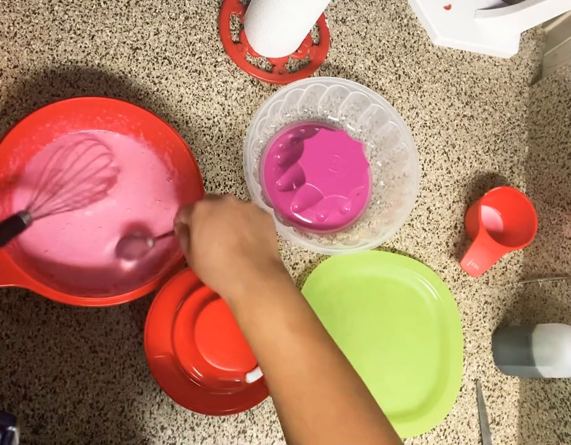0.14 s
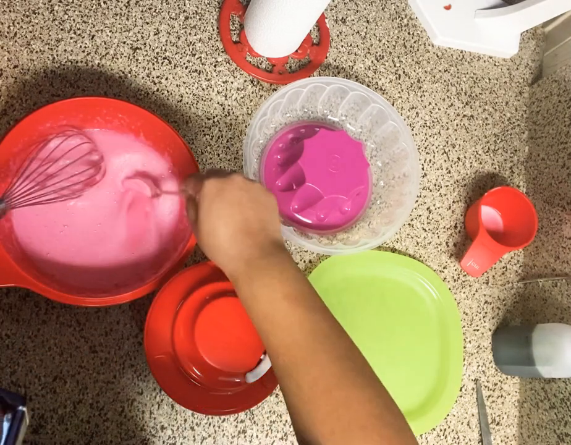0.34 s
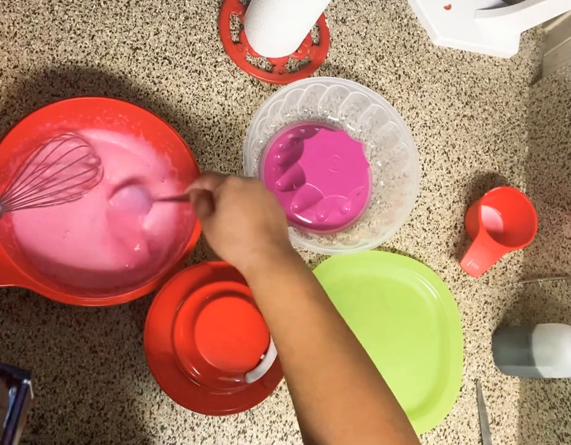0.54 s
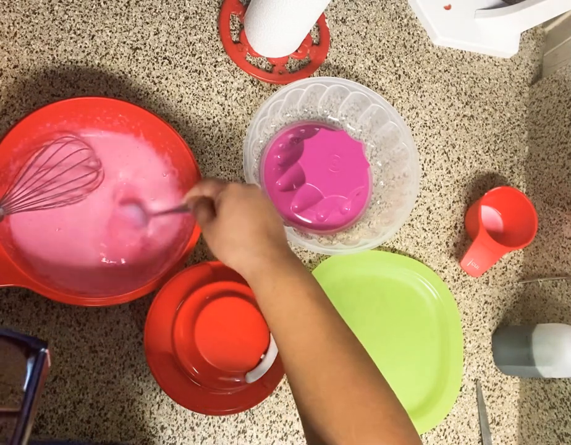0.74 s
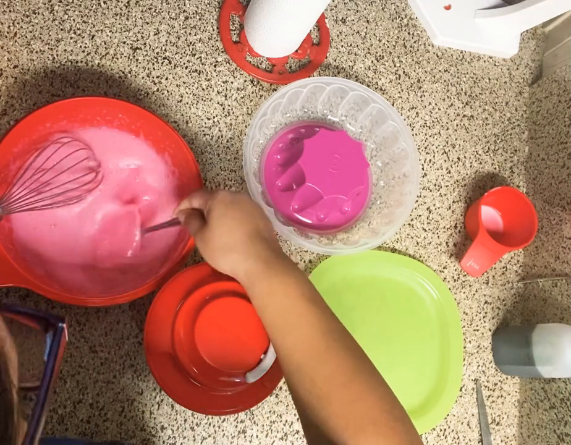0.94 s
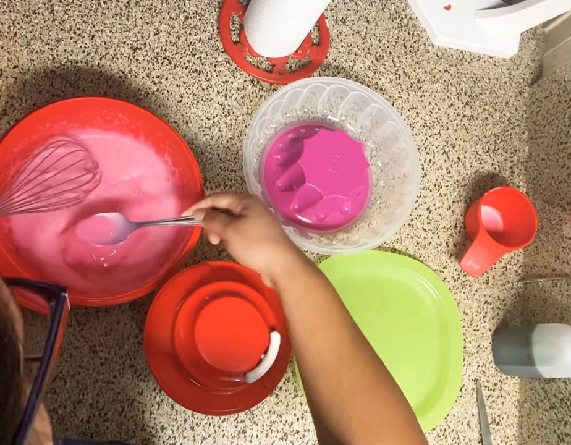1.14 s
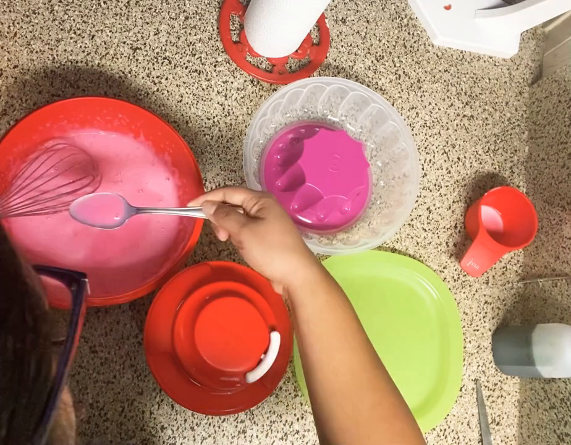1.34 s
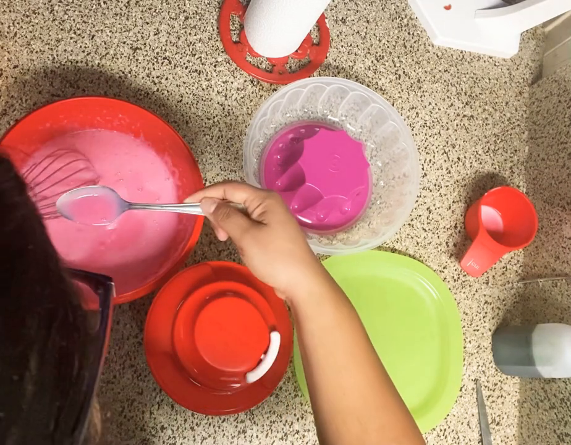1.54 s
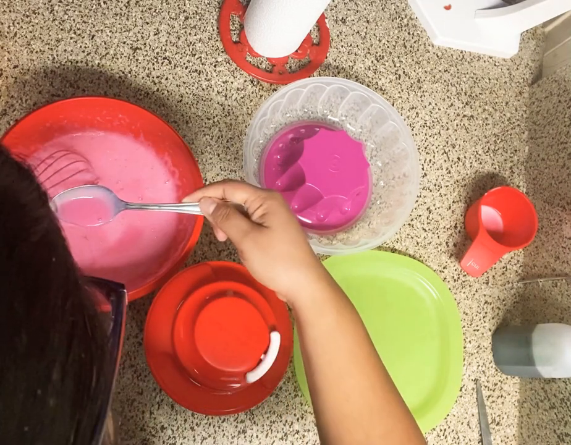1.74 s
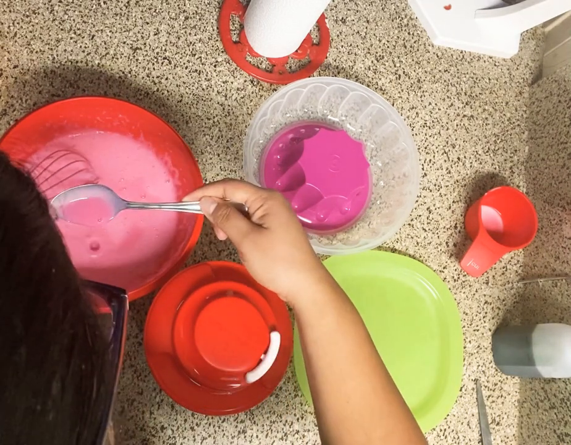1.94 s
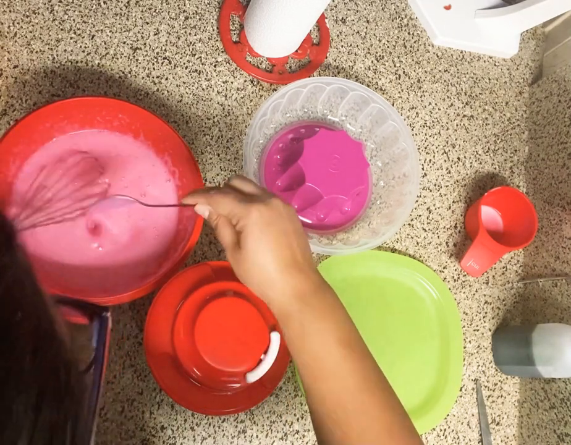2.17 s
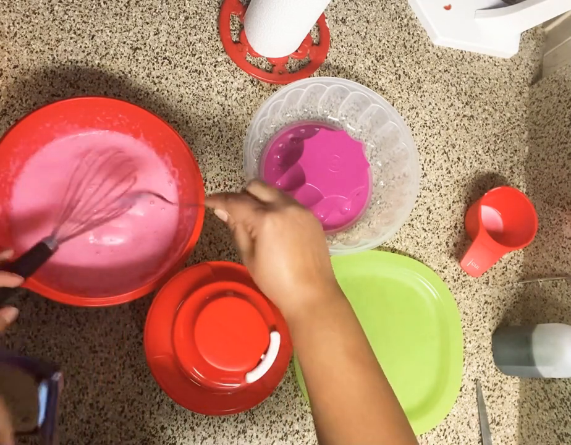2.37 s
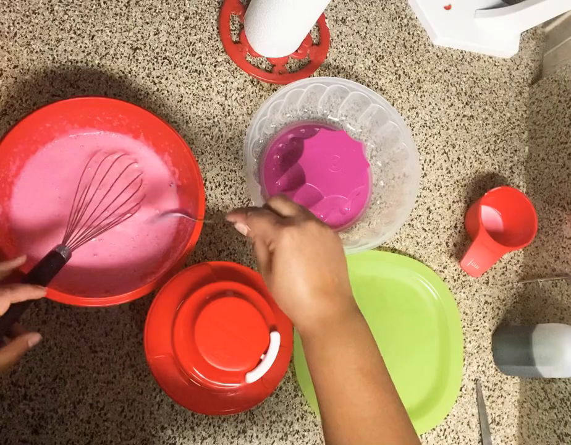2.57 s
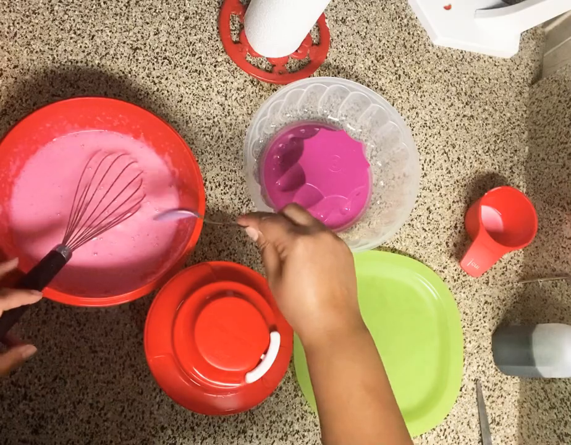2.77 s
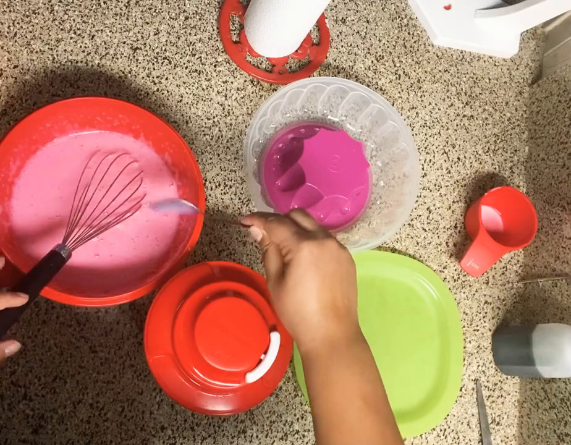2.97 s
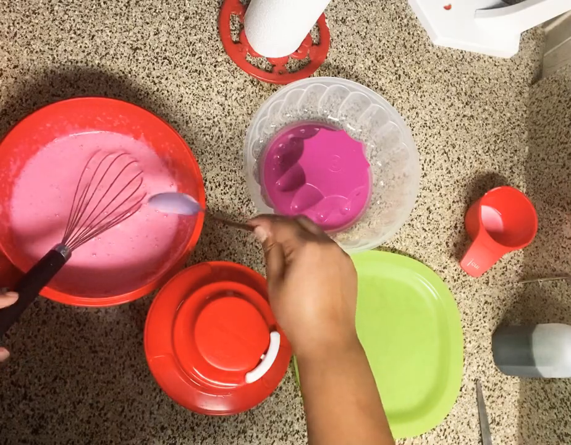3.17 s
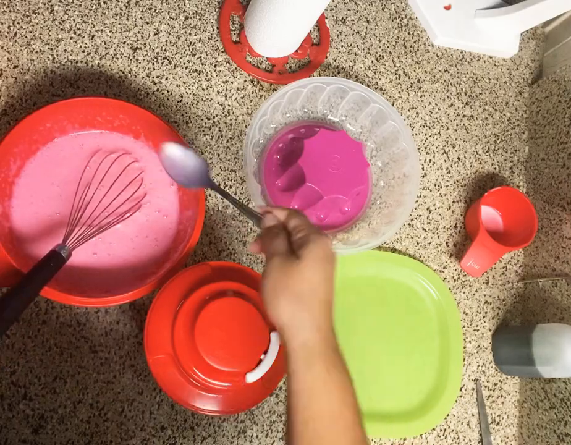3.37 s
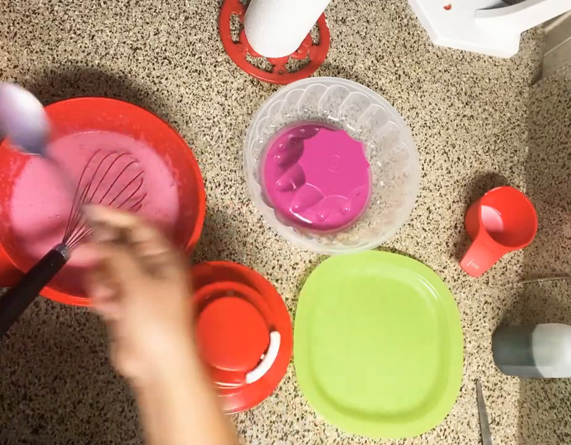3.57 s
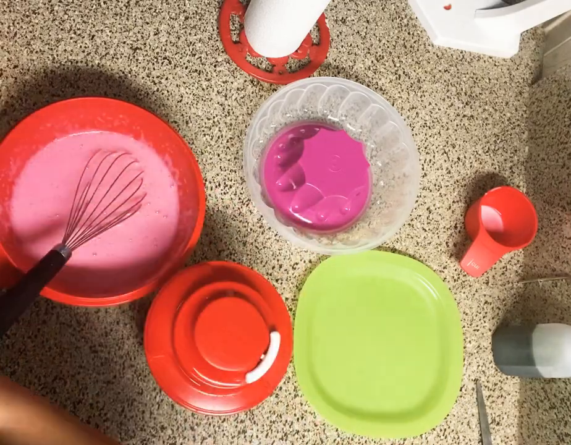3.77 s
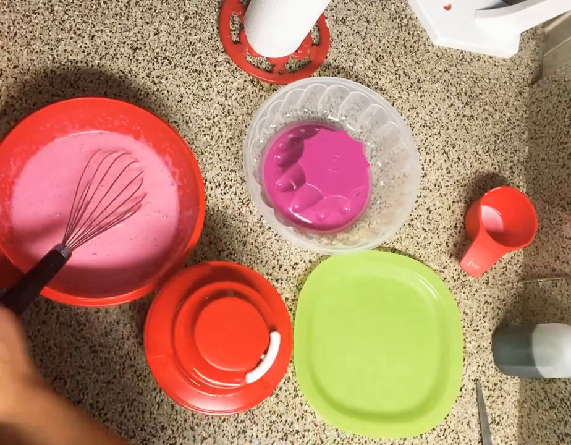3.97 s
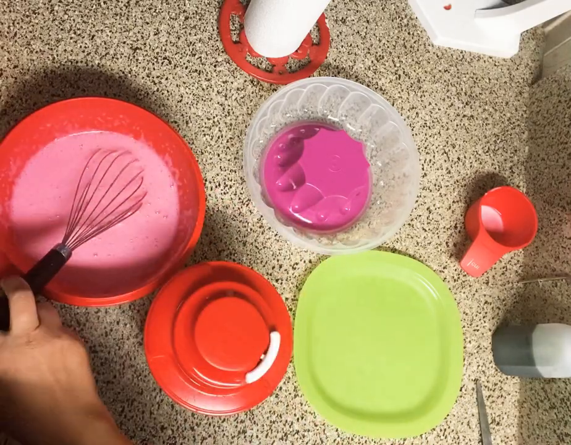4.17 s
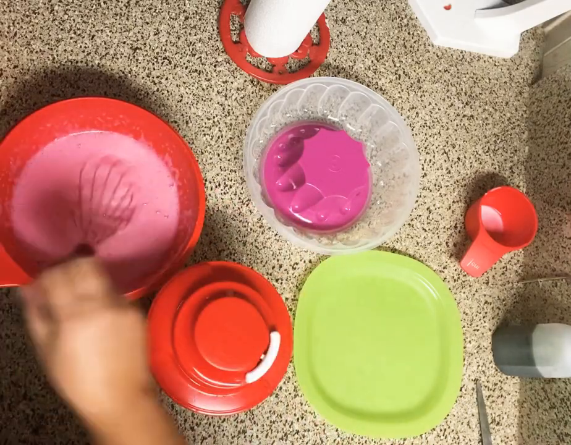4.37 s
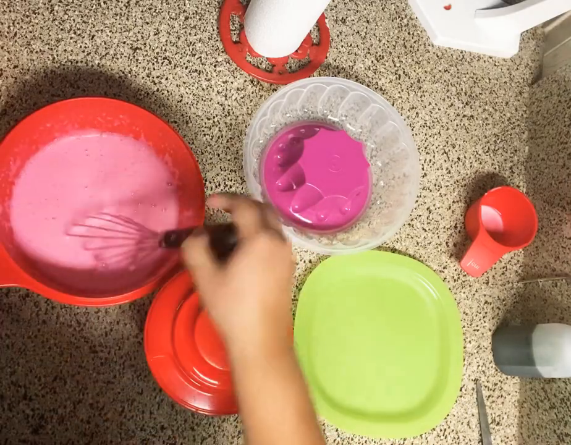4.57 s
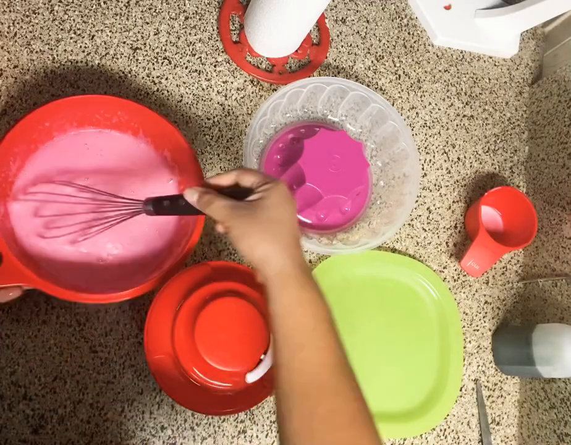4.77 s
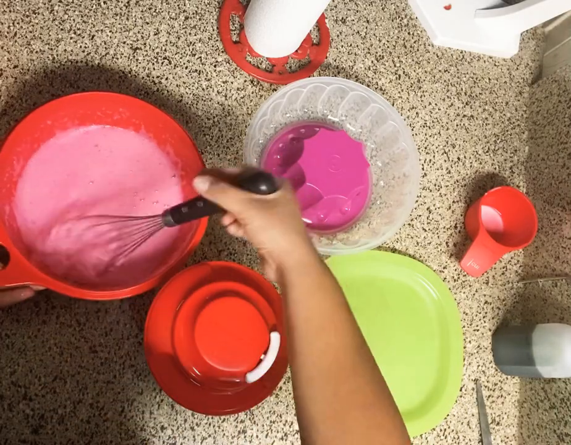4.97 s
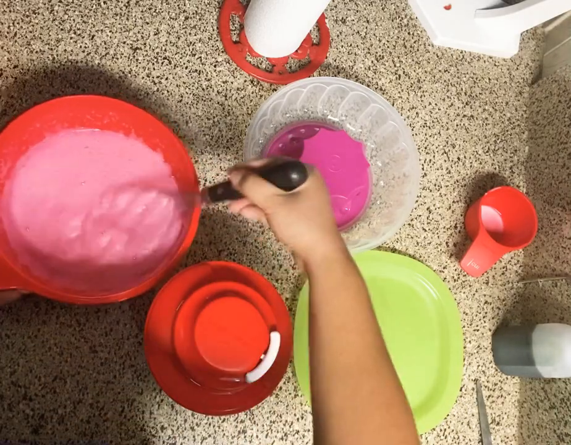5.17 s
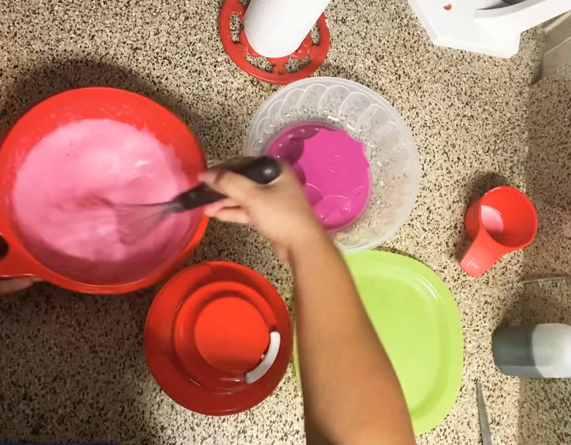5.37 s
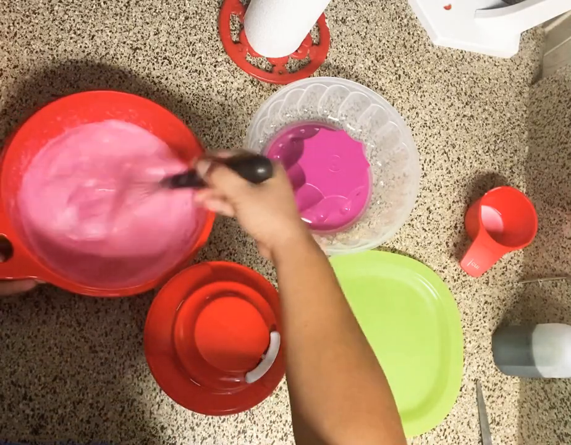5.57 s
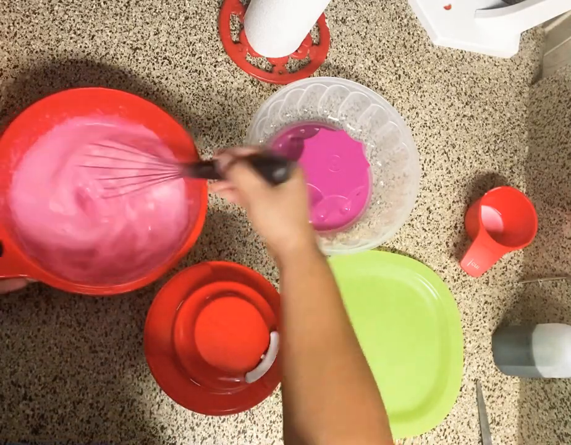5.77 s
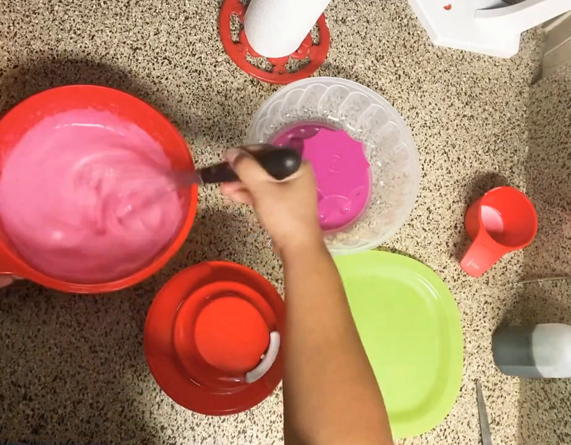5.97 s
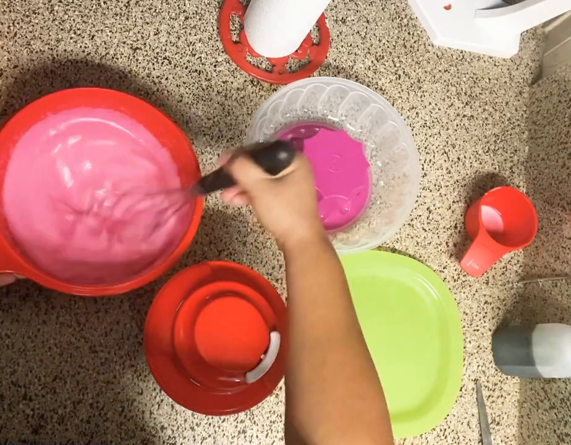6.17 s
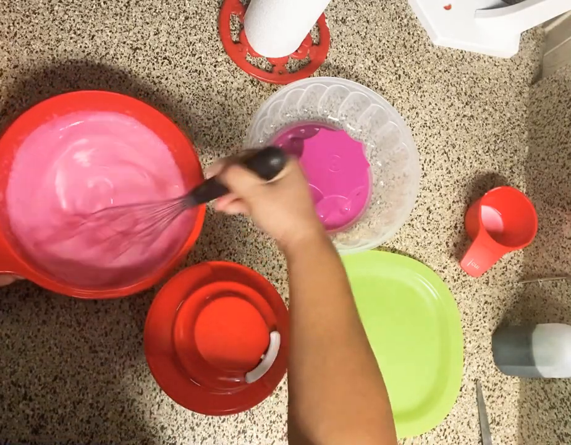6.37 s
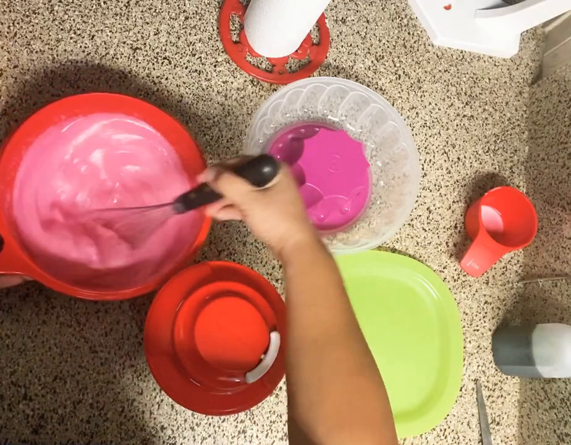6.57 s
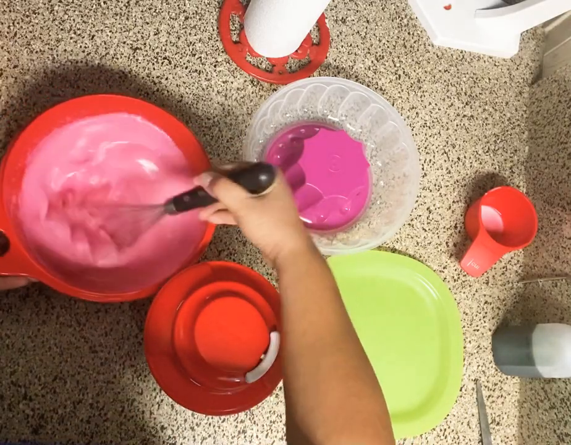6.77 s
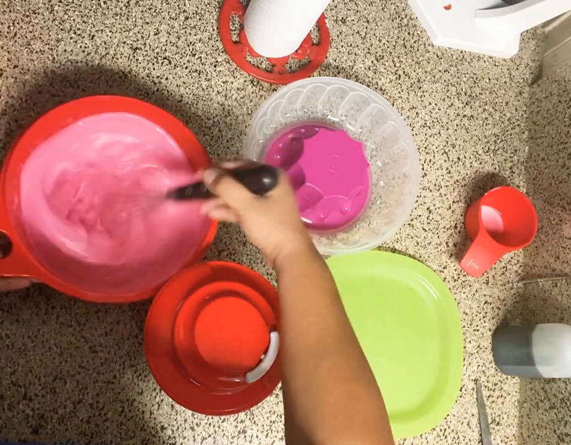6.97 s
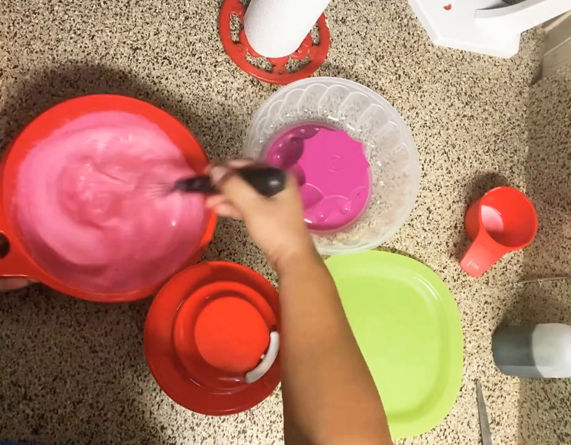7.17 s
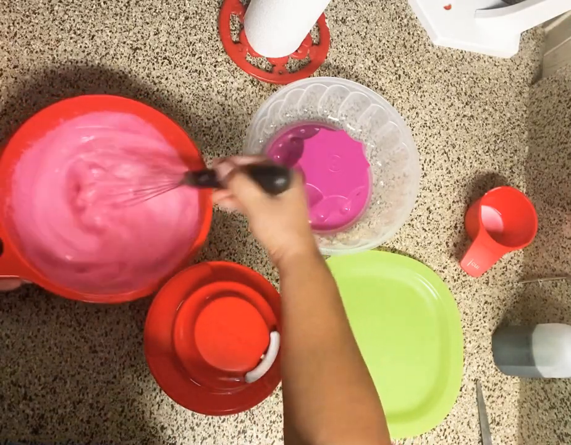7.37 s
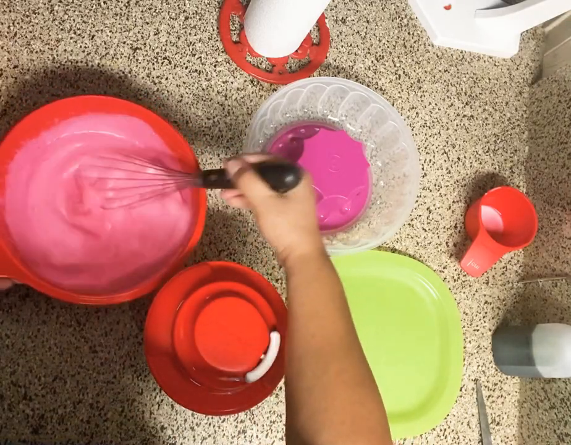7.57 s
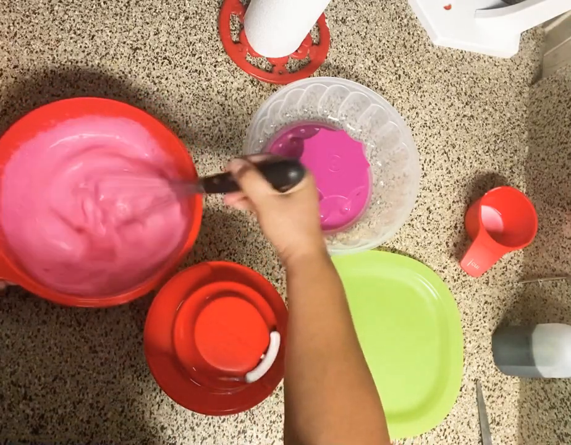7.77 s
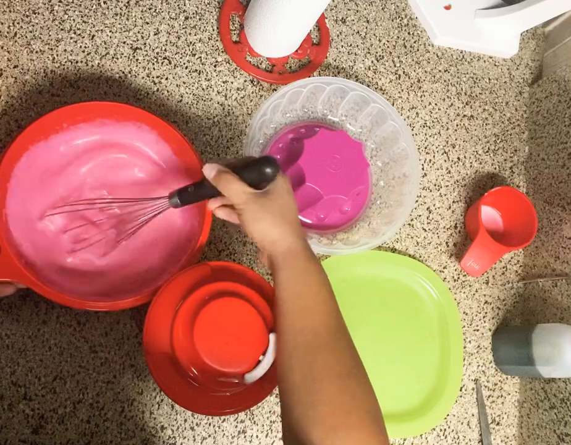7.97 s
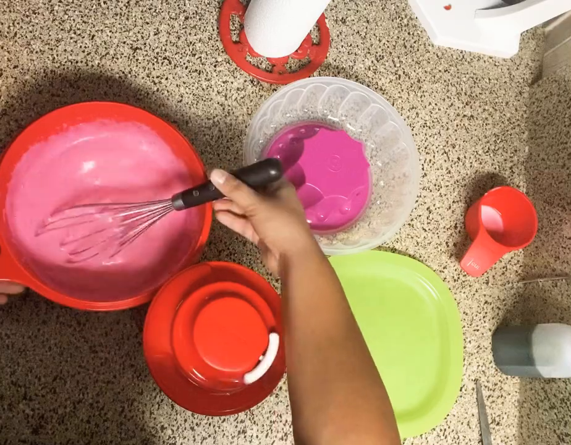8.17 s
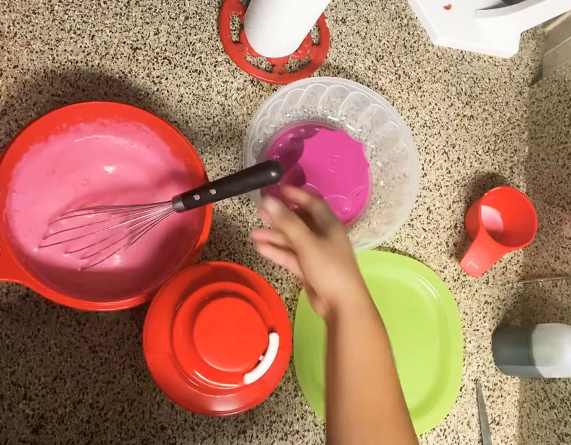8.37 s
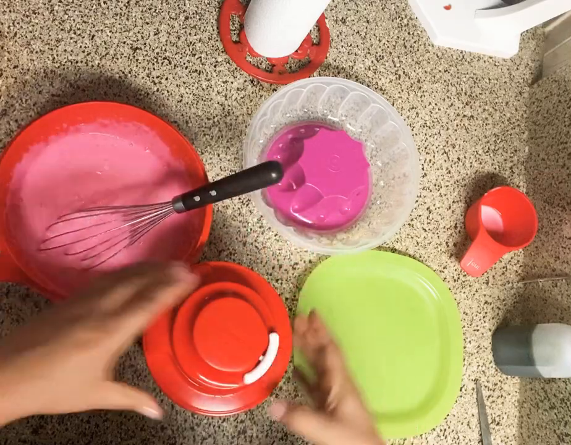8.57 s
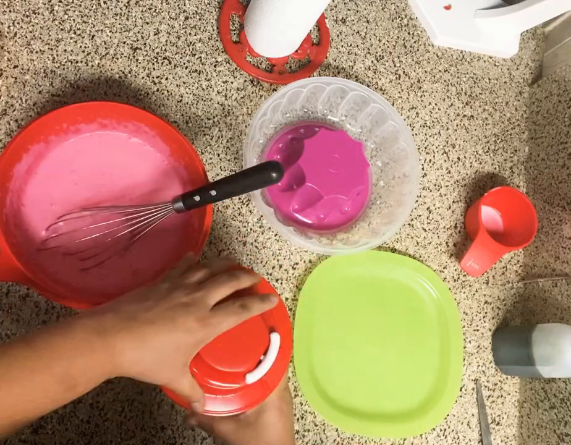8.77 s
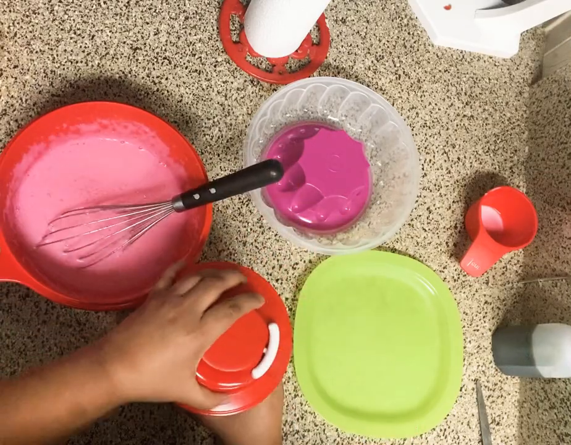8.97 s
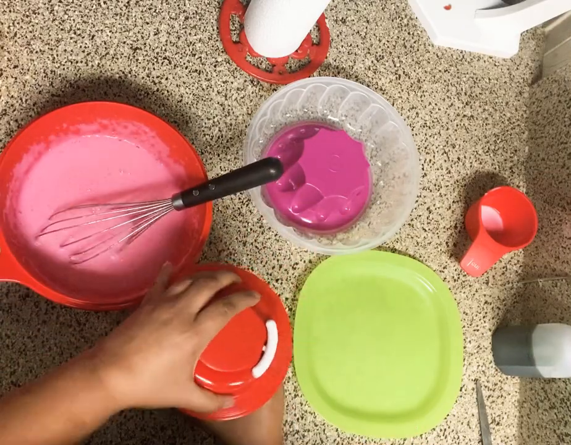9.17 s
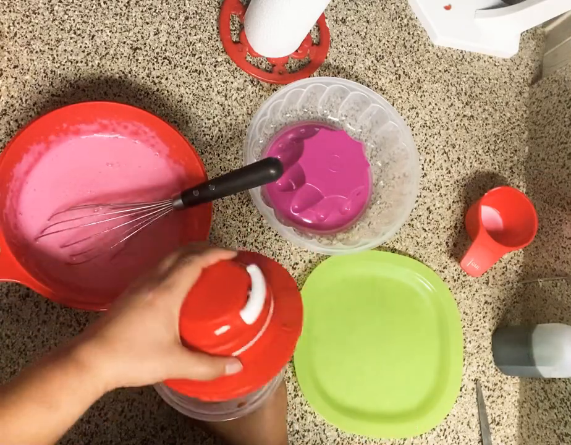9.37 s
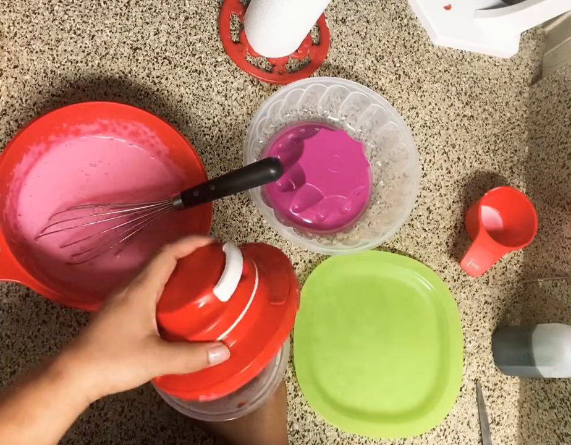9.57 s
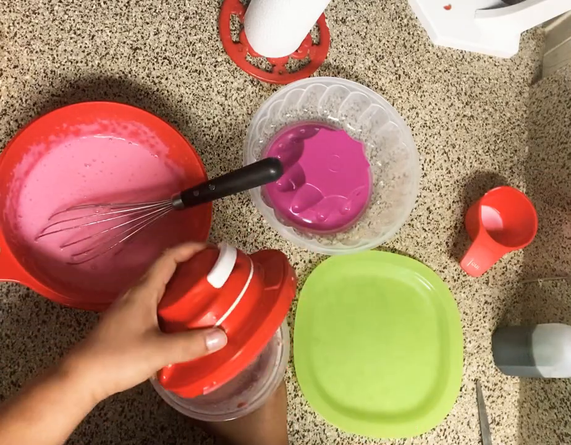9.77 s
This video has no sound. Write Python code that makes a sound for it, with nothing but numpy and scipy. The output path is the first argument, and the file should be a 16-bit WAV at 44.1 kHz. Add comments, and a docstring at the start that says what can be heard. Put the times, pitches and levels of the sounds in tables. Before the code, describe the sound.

Close up in a small kitchen, a metal spoon drags quietly through thin batter in a plastic bowl with small wet plops, judders up the wall and raps the rim three times. A whisk clinks brightly, then beats fast and evenly with sloshing, spray and dull wall knocks. It stops; a plastic tub bumps and slides on stone and its lid creaks faintly. Low room rumble and hiss.

```python
"""Metal drags softly on the floor of a plastic bowl of thin batter: slip noise, with wet clicks and plops.
A spoon judders up the wall in growing slips and is rapped on the rim: a tick, wall modes, base modes.
A wire whisk clinks (detuned metal modes), then beats two strokes to a turn: filtered grit and bubbles.
It is laid down, a plastic tub bumps and slides on a stone counter, and a lid creaks in the grip.
Close microphones also pick up a short kitchen echo, low rumble, hiss and an appliance's whines."""
import sys
import numpy as np
from scipy import signal
from scipy.fft import rfft, irfft
from scipy.io import wavfile
from scipy.ndimage import uniform_filter1d

SR = 44100
rng = np.random.default_rng(int(sys.argv[2]) if len(sys.argv) > 2 else 0)


def int16_out(signal):
    """Quantize to a 16-bit WAV file."""
    q = np.round(np.clip(np.atleast_2d(signal).T, -1, 1) * 32767)
    wavfile.write(sys.argv[1], SR, q.astype(np.int16))


N = 433062
TIME = np.arange(N) / SR
AGE = TIME[:SR // 2]  # seconds since the start of an event

# Modes of the bowl wall. Each row: frequency in Hz, relative level in dB, t60 in s.
WALL = [(501, -7, 0.11), (708.7, 7, 0.034), (760.6, -1.5, 0.085), (850, -8.5, 0.13), (946, -12, 0.038),
        (1190, -23.5, 0.02), (1320, -14.5, 0.13)]
# Modes of the full bowl bouncing on its base. Each row: frequency in Hz, relative level in dB, t60 in s.
BASE = [(57.3, -7, 0.6), (88, -1, 0.42), (121, 2, 0.28), (156, 5, 0.08), (214.5, 0.5, 0.18),
        (275.7, -9.5, 0.072), (405.5, -5, 0.06)]
# Colour of a dull or wet contact. Each row: frequency in Hz, relative level in dB.
CLACK = [(400, -15.5), (900, -6.5), (1400, -8), (2400, -9.5), (3200, -21.5), (15000, -48)]
# Colour of a bright, hard contact. Each row: frequency in Hz, relative level in dB.
TICK = [(800, -27.5), (2500, -0.5), (4000, 2), (6000, 7), (9000, 6.5), (12500, 0.5), (16000, -12.5)]
# Colour of a low bump. Each row: frequency in Hz, relative level in dB.
BUMP = [(40, -11.5), (80, 2), (200, 2), (450, -13.5), (1000, -22.5), (6000, -63)]
# Colour of metal scraping. Each row: frequency in Hz, relative level in dB.
SCRAPING = [(200, 0), (400, 5), (1000, -5.5), (2800, 1), (4500, -6.5), (8000, -9.5), (15000, -26.5)]
# Colour of plastic sliding. Each row: frequency in Hz, relative level in dB.
SLIDING = [(300, 0), (1200, -2), (2900, -1), (4500, -11), (14000, -35)]
# Stereo width of echo and room noise. Each row: frequency in Hz, side signal as a relative share.
APART = [(60, .02), (200, 0.12), (600, 0.55), (1400, 1), (3000, 1), (7000, 0.63)]


def amp(db):
    """Decibels to gain."""
    return 10 ** (np.asarray(db) / 20)


def evened(x):
    """Scales to rms 1."""
    return x / np.sqrt(np.mean(x ** 2) + 1e-20)


def crested(x):
    """Scales so that the loudest two milliseconds have rms 1."""
    return x / np.sqrt(uniform_filter1d(x ** 2, size=88).max() + 1e-20)


def read(points, hz):
    """Reads a table on a log-frequency axis."""
    f, value = np.transpose(points)
    return np.interp(np.log(hz + 1), np.log(f + 1), value)


def add(mix, s, sound):
    """Mixes a sound in at time s."""
    part = mix[max(round(s * SR), 0):][:len(sound)]
    part += sound[:len(part)]


def tint(x, spectrum, size=8192):
    """Causal minimum-phase filter with the given spectrum."""
    log_gain = np.log(amp(read(spectrum, abs(np.fft.fftfreq(size, 1 / SR)))))
    response = np.exp(np.conj(signal.hilbert(log_gain)))
    taps = np.fft.ifft(response).real[:size // 2]
    return signal.oaconvolve(x, taps)[:len(x)]


def grit(per_s, spread_db):
    """A random train of clicks of uneven size and either sign."""
    size = amp(spread_db * np.minimum(rng.exponential(1, N), 4))
    return size * rng.choice([-1, 1], N) * (rng.random(N) < per_s / SR)


def puff(spectrum, t60):
    """A contact: a burst of coloured noise that dies quickly."""
    return crested(tint(rng.standard_normal(len(AGE)) * amp(-60 * AGE / t60), spectrum))


def ring(modes, stretch=1, scatter_db=0, bend=0, rise_s=0.0017):
    """Dying modes; a dented wall starts sharp by 0.3 times bend and relaxes."""
    hz, db, t60 = np.transpose(modes)[:, :, None]
    clock = stretch * (AGE + bend * 0.0024 * (1 - np.exp(-AGE / 0.008)))
    db = db + scatter_db * rng.standard_normal(db.shape)
    tones = amp(db - 60 * AGE / t60) * np.sin(2 * np.pi * hz * clock)
    return crested(tones.sum(0) * (1 - np.exp(-AGE / rise_s)))


def plop(hz, t60, glide, rise_s=0.00051):
    """An air pocket or thud rings briefly; for 0.1 s its pitch glides by this share of itself per second."""
    tone = np.sin(2 * np.pi * hz * AGE * (1 + glide * np.minimum(AGE, .1) / 2))
    return crested(tone * amp(-60 * AGE / t60) * (1 - np.exp(-AGE / rise_s)))


def rubs(rows, attack, sag_db, release_s):
    """A gain curve for rubs: each swells over a share of its length, eases off and lets go."""
    out = np.zeros(N)
    for start, length, db in rows:
        held = amp(db + sag_db * np.minimum(AGE / length, 1)) * np.minimum(AGE / (attack * length), 1)
        add(out, start, held * np.exp(-np.maximum(AGE - length, 0) / release_s))
    return out


def strokes(count=12):
    """The whisk circles and hurries: rows of start s, end s, slosh dB, spray dB and knock dB."""
    first_turn_s, turn_s, hurry_s = 5.2818, .2448, .0029  # each turn is hurry_s shorter than the last
    stop_s = 7.862
    slosh_follows = 0.34  # spray follows the effort fully, slosh and knocks by this share
    # How hard the hand beats. Each row: time in seconds, effort in dB.
    effort_points = [(5.25, -4.5), (5.55, -1.5), (6.5, -0.5), (6.95, 2.5), (7.4, -0.5), (7.6, -2.5),
                     (7.82, -7)]
    # Back and forward stroke of a turn. Each row: start in turns, length in turns, then the
    # slosh, spray and wall knock in dB before the effort is added.
    turn_rows = [(-.405, .39, -37, -45.5, -37), (0, .385, -34.5, -38.5, -37)]
    rows = []
    for turn in range(count):
        for phase, length, slosh_db, spray_db, knock_db in turn_rows:
            turns = turn + phase + np.array([0, length])
            start, end = first_turn_s + turn_s * turns - hurry_s * turns ** 2 / 2
            effort = np.interp(start, *np.transpose(effort_points))
            push = slosh_follows * effort
            rows.append((start, min(end, stop_s), slosh_db + push, spray_db + effort, knock_db + push))
    return rows


def bubbles(low_hz, high_hz, per_s, cycles, count=30):
    """Air pockets of many sizes, each ringing briefly with a rising pitch."""
    out, t = np.zeros(N), AGE[:2048]
    for hz in np.geomspace(low_hz, high_hz, count):
        age = t * hz / cycles
        pop = np.exp(-3 * age) * np.sin(2 * np.pi * hz * t * (1 + 0.07 * np.minimum(age, 2)))
        when, luck = rng.random((int(per_s * N / SR / count), 2)).T
        births = np.bincount((when * N).astype(int), (luck + 0.0386) ** -.5, N)  # a few are much louder
        out += np.sqrt(hz) * signal.oaconvolve(births, pop)[:N]
    return evened(out)


def swirl(x, share=0.67, nearest_s=0.00021, farthest_s=0.001095):
    """The bowl wall reflects the splash from a changing distance, so its colour glides."""
    knots = np.arange(0, TIME[-1] + .1, .055)
    delay = np.interp(TIME, knots, rng.uniform(nearest_s, farthest_s, len(knots)))
    return evened(x + share * np.interp(TIME - delay, TIME, x))


def churn():
    """A gain curve for the stirred-up batter, which keeps lapping between strokes."""
    # One row: start in seconds, length in seconds, level in dB.
    start, length, db = (5.15, 2.68, -45)
    return amp(db) * (TIME > start) * np.exp(-np.maximum(TIME - start - length, 0) / .035)


def beating(beat, rise_s=0.0068, fall_s=0.038, sway_s=0.053):
    """Each stroke slaps into the batter; spray swells with the wires' speed, then the wave sways the bowl."""
    # The whisk dips in and finds its rhythm. Each row: start in seconds, length in seconds,
    # slosh in dB, spray in dB.
    dip_rows = [(4.897, 0.015, -40, -49), (4.941, 0.032, -41, -49.5), (5.028, 0.032, -39.5, -51),
                (5.11, 0.083, -38.5, -53.5)]
    # Colour of the slosh. Each row: frequency in Hz, relative level in dB.
    slosh_colour = [(250, -34), (350, -7), (480, 4.5), (760, 11), (1090, -4), (1400, -12), (1900, -6),
                    (2520, 5.5), (3100, -39), (3900, -9.5), (7000, -37.5), (14000, -38)]
    # Colour of the spray. Each row: frequency in Hz, relative level in dB.
    spray_colour = [(1200, -39.5), (2600, 7), (3400, 3), (4200, 4), (5300, 0.5), (6600, 4.5), (7800, -6.5),
                    (10000, -8.5), (12000, -13), (13500, -50), (16000, -40)]
    # Colour of the swaying bowl. Each row: frequency in Hz, relative level in dB.
    sway_colour = [(40, -12.5), (75, -6.5), (95, -3.5), (121, 3.5), (150, -14), (180, -21.5), (217, 1.5),
                   (260, -14.5), (500, -41)]
    slosh, spray, sway, slaps = np.zeros((4, N))
    dips = [(s, s + length, slosh_db, spray_db) for s, length, slosh_db, spray_db in dip_rows]
    for start, end, slosh_db, spray_db, *_ in dips + beat:
        length = end - start
        entry = np.minimum(AGE / rise_s, 1)
        swell = np.exp(-((AGE / length - .47) / 0.41) ** 2)
        release = np.exp(-np.maximum(AGE - 0.96 * length, 0) / fall_s)
        add(slosh, start - .003, amp(slosh_db) * entry * release)
        add(spray, start, amp(spray_db + 4.5) * swell)
        add(sway, start + sway_s, amp(slosh_db) * np.sqrt(swell) * entry)
        wet = amp(slosh_db - 2) * puff(CLACK, t60=0.046)
        bright = amp(spray_db - 4) * puff(TICK, t60=0.033)
        add(slaps, start + .003, wet + bright)
    foam = swirl(tint(grit(per_s=6000, spread_db=1.5), slosh_colour))
    froth = bubbles(low_hz=930.0, high_hz=3150, per_s=600, cycles=27.7)
    drops = swirl(tint(grit(per_s=6200, spread_db=3.5), spray_colour))
    wave = evened(tint(grit(per_s=1600, spread_db=-1.0), sway_colour))
    liquid = np.hypot(slosh, churn()) * amp(-7.5) * (foam + froth)
    return slaps + liquid + amp(-2) * spray * drops + amp(-7) * sway * wave


def loops(beat, loop_db=-2, count=3):
    """Within each stroke single wire loops break the surface with a short wet click."""
    out = np.zeros(N)
    for start, end, slosh_db, *_ in beat:
        for share in (np.arange(count) + rng.random(count)) / count:
            db = slosh_db + loop_db + 2 * rng.standard_normal()
            add(out, start + share * (end - start), amp(db) * puff(CLACK, t60=.02))
    return out


def furrows(beat, open_hz=1300, shut_hz=2600, width_hz=380, furrow_db=-7):
    """The wires plough a furrow in the batter; as it closes behind them its hollow note rises."""
    out, r = np.zeros(N), np.exp(-np.pi * width_hz / SR)
    for start, end, slosh_db, *_ in beat:
        gone = np.minimum(AGE / (end - start), 1)
        # slow noise on a gliding carrier makes a narrow band that moves
        hiss = signal.lfilter([1], [1, -2 * r, r * r], rng.standard_normal((2, len(AGE))))
        angle = 2 * np.pi * np.cumsum(open_hz * (shut_hz / open_hz) ** gone) / SR
        note = evened(hiss[0] * np.cos(angle) + hiss[1] * np.sin(angle))
        add(out, start, amp(slosh_db + furrow_db) * np.sin(np.pi * gone) * note)
    return out


def wall_hits(beat, late_s=.008, low_hz=720, high_hz=900):
    """Each stroke grazes the near wall as it enters: rows of start s, level dB and pitch Hz."""
    return [(start + late_s * rng.random(), db + rng.standard_normal(), rng.uniform(low_hz, high_hz))
            for start, *_, db in beat]


def knocks(beat):
    """The wires hit the wall through the batter, with a falling gulp; some strokes tip the bowl."""
    # Whisk against wall. Each row: start in seconds, relative level in dB, pitch in Hz.
    knock_rows = [(4.507, -31, 794), (4.662, -25, 748), (4.901, -37.5, 870), (4.95, -30.5, 757),
                  (5.038, -29, 798), (5.161, -32, 772), (5.227, -28, 802), (5.337, -26, 817),
                  (5.515, -28.5, 760), (5.591, -32, 685), (5.733, -34.5, 758), (5.832, -30, 783),
                  (6.072, -29, 665), (6.297, -32.5, 745), (6.377, -28.5, 802), (6.478, -32, 838),
                  (6.666, -33, 756), (6.75, -33.5, 892), (7.009, -30.5, 860), (7.218, -32.5, 895),
                  (7.262, -30.5, 780), (7.425, -29.5, 660), (7.586, -30, 800), (7.657, -30.5, 790)]
    # The whisk catches the rim, and the bowl tips and drops back.
    # Each row: start in seconds, relative level in dB.
    rocking_rows = [(4.172, -36.5), (4.681, -29), (5.44, -29.5), (5.683, -25.5), (7.734, -30), (7.858, -27)]
    out = np.zeros(N)
    for s, db, hz in list(knock_rows) + wall_hits(beat):
        # the pitch is that of the wall's third mode
        add(out, s, amp(db - 9) * ring(WALL, stretch=hz / WALL[2][0], scatter_db=5, rise_s=0.004))
        add(out, s, amp(db - 6.5) * plop(hz, t60=0.056, glide=-14 * rng.random(), rise_s=0.008))
        add(out, s, amp(db - 9) * puff(CLACK, t60=0.075))
    for s, db in rocking_rows:
        base = ring(BASE[:4], stretch=rng.uniform(1.0, 1.03), scatter_db=3.5, rise_s=0.01)
        add(out, s, amp(db - 3) * base)
    return out


def splashes():
    """The hardest strokes smack the batter and trap a pocket of air, whose pitch rises or falls."""
    # Each row: start in seconds, relative level in dB, pitch of the air pocket in Hz.
    slap_rows = [(5.681, -33.5, 1350), (6.009, -32.5, 1660), (6.248, -28.5, 2225), (6.702, -32.5, 1650),
                 (6.93, -35, 2410), (6.975, -30.5, 1350), (7.147, -31, 2553), (7.584, -33, 1360)]
    out = np.zeros(N)
    for s, db, hz in slap_rows:
        pocket = plop(hz, t60=0.04, glide=0.96 * rng.uniform(-1.15, 1), rise_s=0.0035)
        add(out, s, amp(db - 1) * (puff(CLACK, t60=0.081) + pocket))
    return out


def raps(bounce_s=0.0071):
    """A tick on the rim, the wall's note cut short by the resting spoon, then the bowl drops on its base."""
    # Spoon or handle on the rim. Each row: start in seconds, force in dB, wall note in dB against the force.
    rap_rows = [(0.388, -33.5, -0.5), (2.16, -39.5, -9.5), (2.179, -33, -6.5), (2.726, -18.5, -1.5),
                (2.917, -37, 0), (3.052, -18, 0), (3.205, -19.5, 5), (8.06, -37.5, -0.5)]
    tick_growth = 1.427  # harder raps are brighter: dB of tick per dB of force
    # after a rap harder than the threshold, the spoon falls back on the rim once
    rebound_s, rebound_db, rebound_above_db = .035, -18, -28
    rebounds = [(s + rebound_s, force + rebound_db, 0) for s, force, _ in rap_rows if force > rebound_above_db]
    out = np.zeros(N)
    for s, force, wall in rap_rows + rebounds:
        grip = amp(4) * (.3 + .7 * np.exp(-(AGE / .009) ** 2))
        note = grip * ring(WALL, scatter_db=1, bend=.18, rise_s=.002)
        add(out, s, amp(force) * (amp(wall - 2.5) * note + amp(-9) * puff(CLACK, t60=0.093)))
        add(out, s, amp(tick_growth * force - 4) * puff(TICK, t60=0.017))
        base = ring(BASE, stretch=rng.uniform(0.92, 1.03), scatter_db=5.5, rise_s=0.0043)
        add(out, s + bounce_s, amp(force) * (amp(-3.0) * base + amp(-2.5) * puff(BUMP, t60=0.13)))
    return out


def judder(top_hz=220, end_hz=180, jitter=0.14, growth_db=11, uneven_db=3.0, rasp_db=-30):
    """The spoon, drawn up the wall, sticks and slips ever more strongly, fastest midway, with a faint rasp."""
    # One row: start in seconds, length in seconds, level in dB.
    start, length, db = (2.541, 0.044, -27)
    # Colour of the pushes on the bowl. Each row: frequency in Hz, relative level in dB.
    push_colour = [(60, -14.5), (200, 4.5), (400, 2.5), (600, -15.5), (2600, -35), (5000, -56.5)]
    gone = np.minimum(AGE / length, 1)
    force = amp(growth_db * gone) * (gone < 1)
    rate_hz = end_hz + (top_hz - end_hz) * np.sin(np.pi * gone)
    uneven = jitter * rng.random(len(AGE))[(AGE * top_hz).astype(int)]
    cycles = np.floor(np.cumsum(rate_hz) / SR + uneven)
    cycles = np.maximum.accumulate(cycles)  # each whole cycle slips once
    size, rasp = rng.standard_normal((2, len(AGE)))
    slips = np.diff(cycles, prepend=-1) * force * amp(uneven_db * size)
    pushes = crested(tint(slips, push_colour))
    out = np.zeros(N)
    add(out, start, amp(db) * (pushes + amp(rasp_db) * crested(tint(rasp * force, SCRAPING))))
    return out


def wires(place, detune=0.0016, sustain=0.7):
    """The whisk's ring when struck at this place; neighbouring loops are slightly out of tune and beat."""
    # Each row: frequency in Hz, t60 in s before the sustain factor, relative level in dB when struck
    # near the handle, relative level in dB when struck at the loops.
    wire_modes = [(3130, 0.035, -2, -16), (3330, 0.03, 0, -16), (3480, .025, -5, -18),
                  (3607, 0.25, -16, -18), (3975, 0.13, -19, -4), (4064, 0.24, -6, -18),
                  (5590, 0.3, -33, -18), (6374, 0.3, -29, -10), (7360, 0.27, -36, -7),
                  (8225, 0.28, -11, -10), (8985, 0.27, -31, -8), (11040, .2, -21, -17),
                  (11495, 0.18, -24, -3), (13020, 0.24, -32, 1), (13580, 0.22, -32, -8)]
    hz, t60, handle_db, loops_db = np.transpose(wire_modes)[:, :, None]

    def tones():
        tuned = hz * (1 + detune * rng.standard_normal(hz.shape))
        return np.sin(2 * np.pi * (tuned * AGE + rng.random(hz.shape)))

    db = handle_db + place * (loops_db - handle_db) - 60 * AGE / (sustain * t60)
    return (amp(db) * (tones() + .5 * tones())).sum(0)


def clinks():
    """The wire loops slap together and ring, never twice quite alike."""
    # Each row: start in seconds, relative ring in dB, place from 0 (handle) to 1 (loops), relative tick in dB.
    clink_rows = [(4.377, -29.5, 0, -20), (4.381, -29.5, 0, -24), (4.553, -50, .5, -28),
                  (4.562, -27, 1, -13), (4.585, -30, 1, -19), (4.597, -36, .4, -22), (4.621, -33, 1, -14),
                  (4.637, -34, 1, -19), (4.657, -39, 1, -21)]
    out = np.zeros(N)
    for s, db, place, tick_db in clink_rows:
        add(out, s, amp(db + 8.5) * wires(place) + amp(tick_db - 8.0) * puff(TICK, t60=0.025))
    return out


def singing(t60=0.083):
    """A wire bowed by the rim swells on one of its notes, then rings out."""
    # Each row: start in seconds, swell in seconds, frequency in Hz, level in dB.
    song_rows = [(4.458, .03, 5582, -37), (4.468, .022, 4005, -35), (4.5, .045, 4005, -41),
                 (4.564, .02, 3975, -20.5), (4.625, .028, 6374, -31), (4.684, .028, 7360, -33)]
    out = np.zeros(N)
    for s, length, hz, db in song_rows:
        swell = np.minimum(AGE / length, 1) * amp(-60 * np.maximum(AGE - length, 0) / t60)
        add(out, s, amp(db) * swell * np.sin(2 * np.pi * (hz * AGE + rng.random())))
    return out


def rubbing():
    """Friction: tiny slips, coloured by what they shake; hard scraping also makes the wires shimmer."""
    # Metal along the bowl's floor, under the batter; the last row is a short soft knock of the same colour. #
    # Each row: start in seconds, length in seconds, relative level in dB.
    drag_rows = [(0.015, 0.057, -48.5), (2.19, 0.21, -49), (4.155, 0.094, -41.5), (4.266, 0.045, -39),
                 (4.51, 0.21, -36.5), (7.988, 0.025, -41.5)]
    # Colour of that drag. Each row: frequency in Hz, relative level in dB.
    drag_colour = [(200, -15), (600, -6.5), (760, 5.5), (1000, -13.5), (2500, -21), (9000, -46.5)]
    # Wires over each other and the rim. Each row: start in seconds, length in seconds, relative level in dB.
    scrape_rows = [(4.208, 0.034, -48), (4.26, 0.3, -55.5), (4.44, 0.11, -47), (4.555, 0.13, -30),
                   (4.70, 0.17, -54.5)]
    # The tub under the hand. Each row: start in seconds, length in seconds, relative level in dB.
    slide_rows = [(8.6, 0.35, -63), (8.82, 0.16, -59), (8.98, 0.12, -63), (9.1, 0.096, -53.5)]
    drag = rubs(drag_rows, attack=0.21, sag_db=-9.5, release_s=0.013)
    drag *= evened(tint(grit(per_s=1300, spread_db=2), drag_colour))
    pressure = rubs(scrape_rows, attack=0.14, sag_db=-8.5, release_s=0.03)
    slips = grit(per_s=2600, spread_db=1.5)
    scrape = pressure * evened(tint(slips, SCRAPING))
    shimmer = crested(signal.oaconvolve(pressure ** 2 * slips, wires(1))[:N])
    slide = rubs(slide_rows, attack=0.47, sag_db=-6.5, release_s=0.028)
    slide *= evened(tint(grit(per_s=2000, spread_db=0.5), SLIDING))
    return amp(-3.0) * drag + amp(3) * scrape + amp(-28) * shimmer + amp(-1) * slide


def drips():
    """A wet click with a short rising plop; and dry ticks of metal on plastic."""
    # Drips, bubbles and wet touches of the spoon. Each row: start in seconds, relative level in dB,
    # pitch in Hz, relative tick in dB, plop in dB added to its share of the level.
    drip_rows = [(0.505, -39.5, 2530, -83, -7), (0.545, -46, 830, -70, 7), (0.556, -36, 2440, -54.5, -17),
                 (0.622, -41, 1220, -43, -1.5), (0.846, -40, 1110, -53, 1.5), (0.97, -66, 2400, -84, 13.5),
                 (1.947, -43.5, 1190, -77, 1.5), (2.025, -44.5, 1540, -69, -5), (2.088, -49, 2310, -80, -2),
                 (2.588, -30.5, 2110, -51.5, -14.5), (2.688, -40.5, 2640, -55, -1.5),
                 (7.318, -31.5, 2460, -59, 9)]
    # Dry ticks. Each row: start in seconds, level in dB.
    tick_rows = [(0.532, -47.5), (1.232, -67), (1.463, -66), (2.077, -61), (5.436, -44), (5.517, -40),
                 (5.682, -35), (5.765, -51), (7.807, -55)]
    out = np.zeros(N)
    for s, db, hz, tick_db, tone_db in drip_rows:
        tone = amp(tone_db - 5) * plop(hz, t60=0.046, glide=3)
        add(out, s, amp(db) * (tone + amp(-6) * puff(CLACK, t60=0.033)))
        add(out, s, amp(tick_db + 7) * puff(TICK, t60=0.0099))
    for s, db in tick_rows:
        add(out, s, amp(db) * puff(TICK, t60=0.021))
    return out


def bumps():
    """Plastic nudged on stone or plastic: a small clack, one low thud that sinks in pitch, a soft shudder."""
    # Each row: start in seconds, thud in dB, relative clack in dB, starting pitch in Hz.
    bump_rows = [(0.387, -27, -49.5, 337), (2.598, -29, -57, 170), (4.312, -47, -48, 271),
                 (4.381, -35, -36, 158), (4.519, -32.5, -41, 233), (8.06, -38.5, -47, 594),
                 (8.863, -56.5, -49, 179.3), (8.927, -40, -56, 287), (8.955, -37, -57, 219),
                 (9.136, -39, -62.5, 149), (9.169, -22.5, -34.5, 194)]
    out = np.zeros(N)
    for s, db, clack_db, hz in bump_rows:
        add(out, s + .002, amp(db) * plop(hz, t60=.028, glide=-9, rise_s=.005))
        add(out, s + .002, amp(db - 8) * puff(BUMP, t60=.13))
        add(out, s, amp(clack_db + 3) * puff(SLIDING, t60=.03))
    return out


def creaks():
    """The lid sticks and slips in the grip, and each slip rings the plastic."""
    # Each row: start in seconds, length in seconds, relative level in dB.
    creak_rows = [(9.598, 0.044, -52), (9.642, 0.014, -52.5), (9.755, 0.048, -63.5)]
    # Modes of the lid. Each row: frequency in Hz, relative level in dB, t60 in s.
    lid_modes = [(1150, -3, .008), (2010, 0, .013), (2520, -4, .008), (3380, -3, .007)]
    slips = grit(per_s=1200, spread_db=-1.0)
    lid = evened(signal.oaconvolve(slips, ring(lid_modes))[:N])
    rasp = evened(tint(slips, SLIDING))
    return rubs(creak_rows, attack=0.32, sag_db=-3.5, release_s=0.0036) * amp(-2) * (lid + rasp)


def kitchen(x, wet_db):
    """Direct sound and a short tail from tiles and cupboards, which differs between the sides."""
    # Decay of the room. Each row: frequency in Hz, t60 in s.
    room_t60 = [(100, 0.46), (500, 0.28), (3000, 0.26), (15000, 0.2)]
    # Colour of the echo. Each row: frequency in Hz, relative level in dB.
    echo_colour = [(60, -15.5), (250, -5), (750, -5.5), (3000, -3), (15000, -7)]
    hz, t, z = signal.stft(rng.standard_normal((2, len(AGE))), SR, nperseg=256)
    fading = z * amp(-60 * t / read(room_t60, hz)[:, None])
    tail = signal.istft(fading, SR, nperseg=256)[1][:, :len(AGE)]
    tail = tail * np.clip((AGE - .002) / 0.0013, 0, 1)  # the echo waits two milliseconds
    tail = rfft(tail / np.linalg.norm(tail[0]))
    hz = np.fft.rfftfreq(len(AGE), 1 / SR)
    tail[1] *= read(APART, hz)
    echo = irfft(tail * amp(wet_db + read(echo_colour, hz)))
    mid, side = signal.oaconvolve(x[None], echo, axes=1)[:, :N]
    return np.array([x + mid + side, x + mid - side])


def background(apart_db=-4):
    """Low rumble shared by both sides, faint hiss and an appliance's narrow whines."""
    # Colour of the room air. Each row: frequency in Hz, relative level in dB.
    air_colour = [(20, -21), (55, 1), (110, -13.5), (250, -27.5), (700, -40), (2400, -43), (4000, -50.5),
                  (16000, -53)]
    # Whines. Each row: frequency in Hz, width in Hz at half amplitude, relative level in dB.
    whine_rows = [(1630, 88, -94), (2780, 54, -85.5)]
    hz = np.fft.rfftfreq(N, 1 / SR)
    noise = rfft(rng.standard_normal((2, N)))
    noise[1] *= amp(apart_db) * read(APART, hz)
    layers = amp(-61.5) * evened(irfft(noise * amp(read(air_colour, hz)), N))
    for f, width, db in whine_rows:
        peak = 1 / (1 + (2 * (hz - f) / width) ** 2)
        layers += amp(db) * evened(irfft(noise * peak, N))
    mid, side = layers / np.sqrt(2)
    return np.array([mid + side, mid - side])


def scene():
    """Blows, liquid and wires sound in the same small room."""
    beat = strokes()
    blows = kitchen(raps() + drips() + bumps() + creaks() + judder(), wet_db=-3.5)
    liquid = beating(beat) + loops(beat) + furrows(beat) + knocks(beat) + splashes()
    batter = kitchen(liquid + rubbing(), wet_db=-4.5)
    metal = kitchen(clinks() + singing(), wet_db=-1.5)
    return blows + batter + metal + background()


def record(dry, lag_hz=8300, low_cut_hz=25, edge_hz=15900):
    """Two close microphone ports, whose phase gap reaches one radian at lag_hz; then the band limits."""
    # Balance of the ports. Each row: frequency in Hz, left against right in dB.
    port_balance = [(60, 0.5), (200, 0), (400, -4), (1300, 2), (2400, 1.5), (4400, 0)]
    hz = np.fft.rfftfreq(N, 1 / SR)
    port = amp(read(port_balance, hz) / 2) * np.exp(-.5j * (hz / lag_hz) ** 2)
    low_cut = hz / (hz - 1j * low_cut_hz)
    pair = irfft(rfft(dry) * np.array([port, 1 / port]) * low_cut, N)
    high_cut = signal.firwin(511, edge_hz, window=("kaiser", 9), fs=SR)
    return signal.oaconvolve(pair, high_cut[None], "same")


dry = scene()
out = record(dry)
int16_out(out)
```